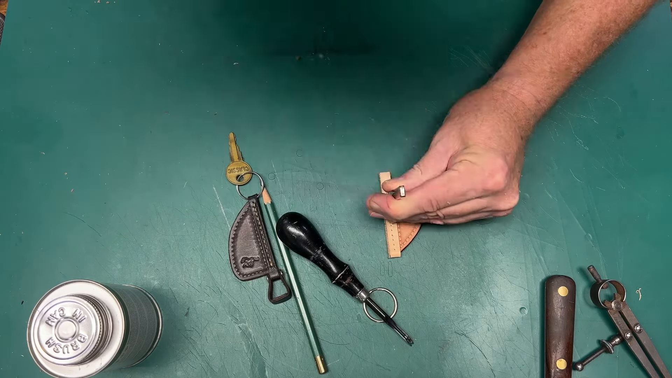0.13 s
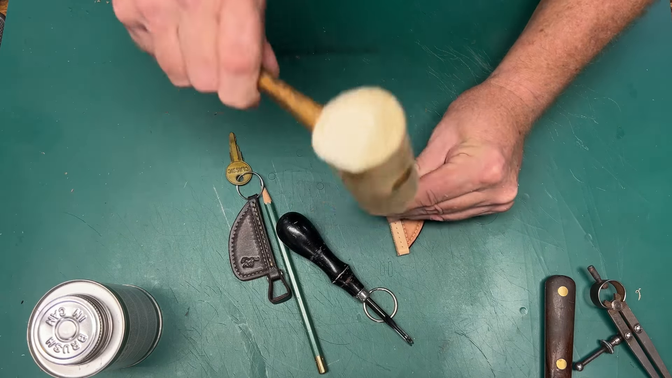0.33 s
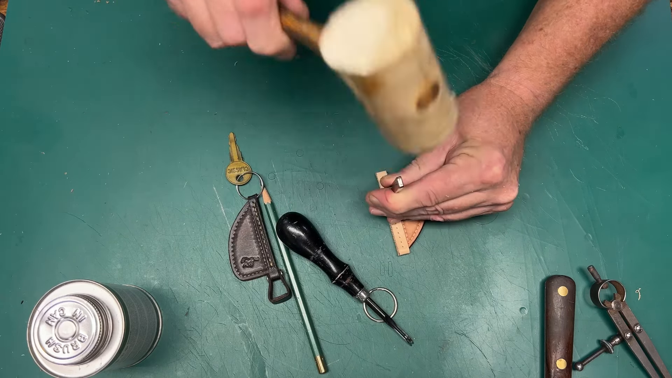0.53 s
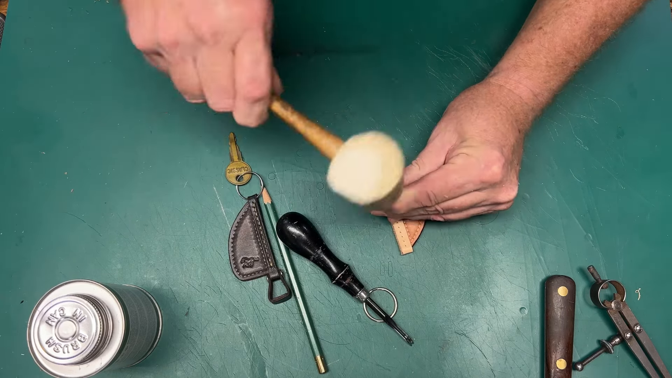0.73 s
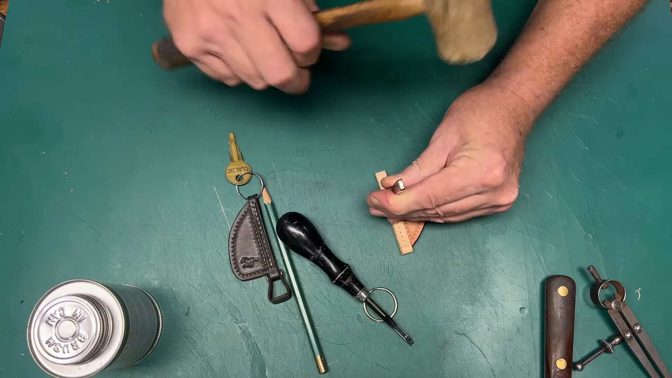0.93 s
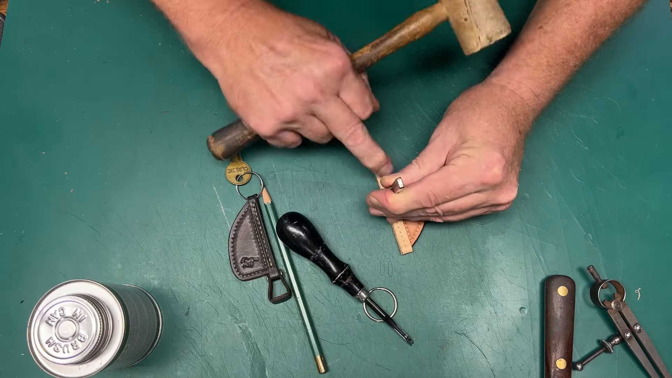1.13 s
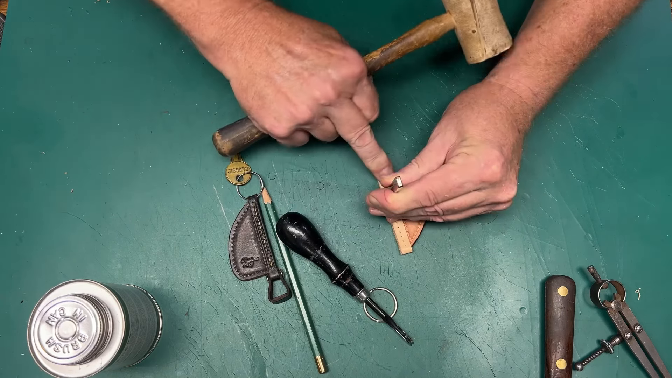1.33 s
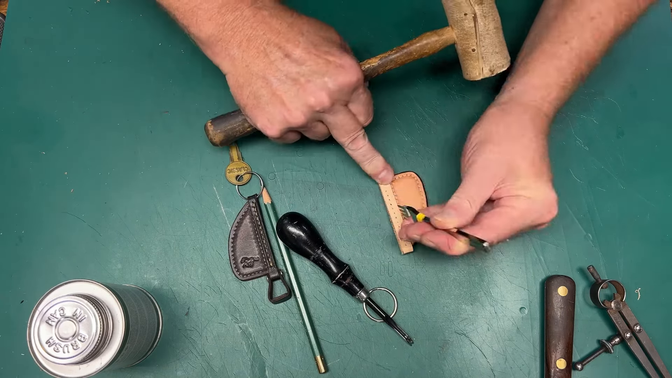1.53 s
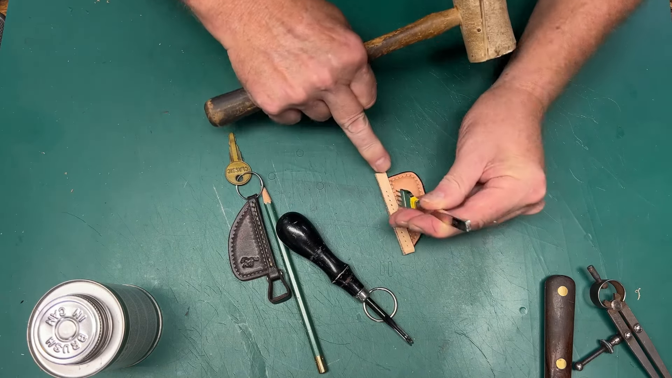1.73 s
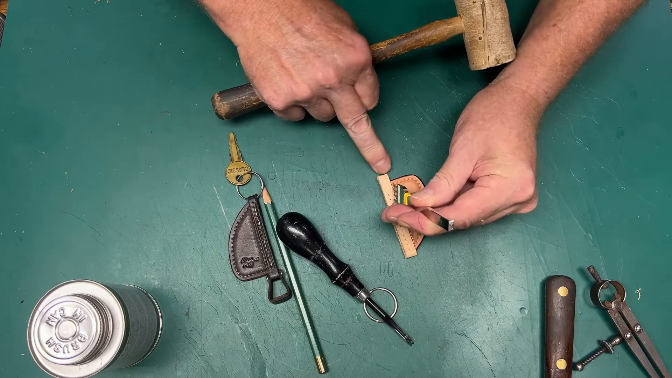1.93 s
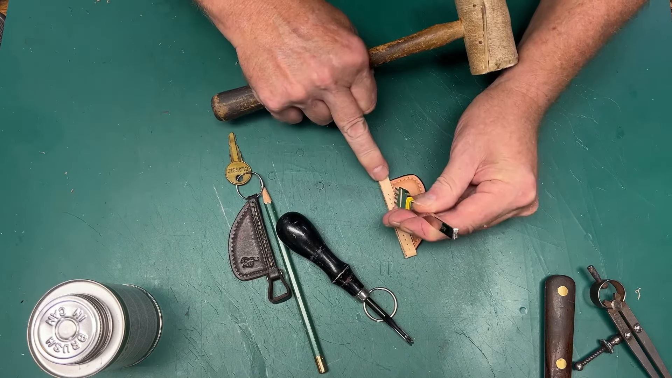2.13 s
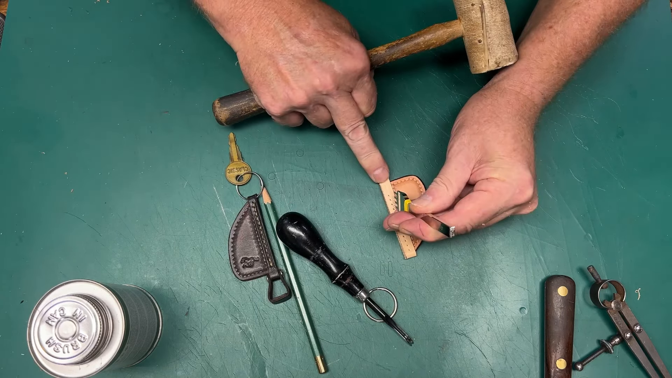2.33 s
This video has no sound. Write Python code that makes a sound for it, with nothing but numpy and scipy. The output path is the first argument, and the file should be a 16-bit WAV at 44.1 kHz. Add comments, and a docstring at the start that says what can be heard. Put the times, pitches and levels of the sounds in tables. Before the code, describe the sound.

Two hard mallet cracks on a stitching iron over a wooden bench, then faint handling taps.

```python
"""A mallet drives a stitching iron into leather on a wooden bench, twice; two light taps of the iron follow.
Each blow is a crack that the bench top spreads into a falling chirp, with echoes, decaying sine modes
and a dying noise tail for the room. Filtered grains make the scuffs of fingers and iron, and a rustling
treble wash after the second blow; a decaying low sine is the leather dropping back. At the start an
earlier knock dies away as noise, and room noise with a faint wavering mains hum lies under it all."""
import sys
import numpy as np
from scipy import signal
from scipy.fft import rfft, irfft
from scipy.io import wavfile
from scipy.ndimage import uniform_filter1d

SR = 44100
rng = np.random.default_rng(int(sys.argv[2]) if len(sys.argv) > 2 else 0)


def natural_amplitude(level_db):
    """Convert a level in decibels to a linear amplitude factor, elementwise."""
    exponent = np.asarray(level_db, float) / 20
    return 10 ** exponent


def pcm_store(signal):
    """Save signal as 16-bit PCM."""
    levels = np.round(np.clip(np.atleast_2d(signal), -1, 1) * 32767)
    wavfile.write(sys.argv[1], SR, levels.astype(np.int16).T)


N = 105840
LEAD = 1024  # samples of room before a blow for the filters to settle


def read(points, hz):
    """Interpolates a table of (Hz, value) along log frequency."""
    f, value = np.transpose(points)
    return np.interp(np.log(hz + 1), np.log(f + 1), value)


def evened(x):
    """Scales to an rms of 1."""
    return x / np.sqrt(np.mean(x ** 2) + 1e-20)


def add(mix, start_s, sound):
    """Adds a sound to the mix in place, cut at the end."""
    part = mix[:, round(start_s * SR):][:, :sound.shape[1]]
    part += sound[:, :part.shape[1]]


def diffuse(colour, size):
    """Spectra of a coloured noise pair of rms 1, its left-right likeness set by frequency."""
    # Each row: frequency in Hz, left-right likeness from 0 to 1.
    likeness = [(60, 1), (150, 0.066), (380, 0.95), (950, 0.56), (2380, 0.011), (5980, 0.13),
                (15000, 0.026)]
    hz = np.fft.rfftfreq(size, 1 / SR)
    a, b = rfft(rng.standard_normal((2, size)))
    same = np.clip(read(likeness, hz), 0, 1)
    pair = np.array([a, same * a + np.sqrt(1 - same ** 2) * b])
    z = pair * natural_amplitude(read(colour, hz))
    return hz, z / np.sqrt(np.mean(irfft(z, size) ** 2))


def dying(colour, t60s, size):
    """Diffuse noise whose bands die each at its own speed."""
    hz, z = diffuse(colour, size)
    t = np.arange(size) / SR
    one = np.eye(len(t60s))
    total = 0
    for k, (_, t60_s) in enumerate(t60s):
        band = read([(f, w) for (f, _), w in zip(t60s, one[k])], hz)
        total = total + irfft(z * band, size) * natural_amplitude(-60 * t / t60_s)
    return total


def rings(modes, t):
    """Struck modes: one exponentially decaying sine each."""
    return [natural_amplitude(db - 60 * t / t60_s) * np.sin(2 * np.pi * hz * t) for hz, db, t60_s in modes]


def air():
    """Coloured room noise plus hum partials whose amplitudes waver with smoothed noise."""
    # Room noise colour. Each row: frequency in Hz, relative density in dB per Hz.
    air_colour = [(15, -70), (25, -38), (43, -14.5), (68, -5), (87, -19.5), (105, -7), (123, -4.5),
                  (150, -18), (242, -20.5), (354, -23), (600, -30.5), (1300, -37.5), (2500, -45.5),
                  (4370, -58), (8500, -57.5), (10200, -72), (12000, -65.5), (16000, -74.5)]
    # Hum partials. Each row: frequency in Hz, rms level before waver in dB.
    hum_partials = [(59.2, -67.5), (118.4, -64)]
    air_db, hum_width_hz, hum_waver = -59, 6, 0.6
    t = np.arange(N) / SR
    hum = 0
    for hz, db in hum_partials:
        slow = uniform_filter1d(rng.standard_normal(N), int(SR / hum_width_hz))
        waver = 1 + evened(slow) * hum_waver
        hum = hum + np.sqrt(2) * natural_amplitude(db) * waver * np.sin(2 * np.pi * (hz * t + rng.random()))
    return natural_amplitude(air_db) * irfft(diffuse(air_colour, N)[1], N) + hum


def earlier_knock():
    """Tail of an earlier knock: diffuse noise with a decay time per band."""
    # Tail colour. Each row: frequency in Hz, relative density in dB per Hz.
    tail_colour = [(24, -37.5), (40, -17.5), (60, 2.5), (97, -16), (132, 2), (167, -21), (218, 12),
                   (264, -25), (335, -9), (386, -14.5), (415, -3.5), (446, -27), (718, -22), (1080, -28),
                   (1700, -28.5), (1960, -23.5), (3080, -41.5), (3470, -24), (4000, -39.5), (5730, -39.5),
                   (8190, -60.5), (9910, -70.5), (12000, -58), (15600, -105), (22000, -120)]
    # Tail decay. Each row: frequency in Hz, t60 in seconds.
    tail_t60s = [(60, .45), (130, .3), (230, .24), (400, .4), (800, .45), (1500, .45), (3500, .36),
                 (8000, .33)]
    earlier_db = -30
    return natural_amplitude(earlier_db) * dying(tail_colour, tail_t60s, size=32768)


def scuff(length_s, db, hz, width_hz):
    """A swelling cluster of tiny grains through one broad resonance, with a short diffuse tail."""
    grains_per_s, grain_spread_db, wet_db, tail_t60_s = 5700, 1, -5.5, 0.24
    t = np.arange(0, length_s + 0.17, 1 / SR)
    grains = rng.standard_normal(len(t)) * (rng.random(len(t)) < grains_per_s / SR)
    grains *= natural_amplitude(grain_spread_db * rng.exponential(1, len(t)))
    b, a = signal.iirpeak(hz, hz / width_hz, SR)

    def band(v):
        return evened(signal.lfilter(b, a, signal.lfilter(b, a, v)))

    ramp = np.minimum(t / length_s, 1)
    shape = np.sin(np.pi * ramp ** 1.2) ** 0.84
    tail = natural_amplitude(wet_db - 60 * abs(t - 0.44 * length_s) / tail_t60_s) * ramp
    return natural_amplitude(db) * (band(grains) * shape + tail * band(rng.standard_normal((2, len(t)))))


def thump():
    """The leather drops back: one soft low swing of the bench, a decaying sine."""
    level_db, hz, t60_s, rise_s = -36, 70, 0.214, 0.035
    t = np.arange(0, 0.4, 1 / SR)
    envelope = natural_amplitude(level_db - 60 * t / t60_s) * (1 - np.exp(-t / rise_s))
    return envelope * np.sin(2 * np.pi * hz * t) * np.ones((2, 1))


def ringing(size):
    """Bench modes as decaying sines and the room tail as dying noise, the same for every blow."""
    # Bench modes. Each row: frequency in Hz, relative level in dB, t60 in seconds.
    bench_modes = [(58.7, -11.5, 0.29), (84.16, -7, 0.4), (109.26, -6.5, 0.41), (137.45, 2.5, 0.2),
                   (240, -7.5, .4), (334, -2.5, .3), (415, -19, .3), (496, -12.5, 0.23), (619, -23.5, 0.49),
                   (763, -18.5, 0.19)]
    # Room tail colour. Each row: frequency in Hz, relative density in dB per Hz.
    room_colour = [(24, -46), (40, -19.5), (124, -8.5), (163, -10), (231, -4), (269, -11), (337, -3),
                   (444, -12), (615, -9), (2320, -21.5), (8990, -45), (10200, -71), (16000, -92)]
    # Room tail decay. Each row: frequency in Hz, t60 in seconds.
    room_t60s = [(60, .55), (160, 0.65), (420, 0.51), (1100, 0.48), (2900, .45), (7700, .42), (14000, .3)]
    bench_db, bench_wide, bench_rise_s = -12.5, 0.083, 0.005
    room_db, early_db, early_t60_s, room_rise_s = -20, 2, 0.19, 0.0041
    t = np.arange(size) / SR
    # random left and right gains per mode
    bench = sum(ring * (1 + bench_wide * rng.standard_normal((2, 1))) for ring in rings(bench_modes, t))
    bench = bench * (1 - np.exp(-t / bench_rise_s))
    early_boost = 1 + natural_amplitude(early_db - 60 * t / early_t60_s)
    room = dying(room_colour, room_t60s, size) * early_boost * (1 - np.exp(-t / room_rise_s))
    return natural_amplitude(bench_db) * bench + natural_amplitude(room_db) * room


def blow(db, tilt_db, path_m, after):
    """Crack, snap and modes spread by bending waves so that treble comes first, plus unspread echoes."""
    # Crack colour. Each row: frequency in Hz, relative density in dB.
    crack_colour = [(30, -33), (60, -12.5), (150, -6), (300, -0.5), (450, 1), (600, -1), (800, -10.5),
                    (1100, -18), (1500, -7), (2000, -13), (2800, -22.5), (5000, -26), (16000, -62),
                    (18000, -88.5)]
    # Noise snap colour. Each row: frequency in Hz, relative density in dB per Hz.
    snap_colour = [(500, -31.5), (1200, -8), (2000, 2), (3500, -6.5), (5700, -12), (7700, -15), (9000, -11),
                   (10500, -20), (16000, -31.5), (18000, -67.5)]
    # Mallet head and iron modes. Each row: frequency in Hz, relative level in dB, t60 in seconds.
    mallet_modes = [(325.5, -13.5, 0.01), (518, -8.5, .025), (588, -8, 0.033), (1557, -11.5, 0.006),
                    (1960, -11, 0.018), (2400, -19, 0.041), (3276, -20.5, .02), (4600, -24.5, 0.0071),
                    (6020, -26.5, 0.0083), (9280, -27.5, .01)]
    # First strong reflections. Each row: delay in seconds, relative level in dB, signed factor.
    reflections = [(0.018, -9.5, 1), (.0213, -10.5, -1), (0.027, -10.5, 1), (.0368, -14, -0.52)]
    snap_db, snap_t60_s, snap_rise_s, snap_wide = -9.5, 0.014, 0.001, 0.46
    # group speed at 1 kHz, growing with the root of frequency up to thick_hz, then constant
    bend_m_per_s, thick_hz = 190, 2000
    echo_top_hz, lag_s = 180, -0.00004  # left leads
    size = after.shape[1]
    hz, t = np.fft.rfftfreq(size, 1 / SR), np.arange(size) / SR

    def late(s):
        return np.exp(-2j * np.pi * hz * s)

    def peak1(z):
        return z / abs(irfft(z, size)).max()

    root = 2 * np.sqrt(np.minimum(hz, thick_hz)) + np.maximum(hz - thick_hz, 0) / np.sqrt(thick_hz)
    bend = np.exp(-2j * np.pi * path_m / bend_m_per_s * np.sqrt(1000) * root)
    crack = peak1(natural_amplitude(read(crack_colour, hz)) * bend)

    echo_pulse = peak1(hz / (hz + 80) / (1 + (hz / echo_top_hz) ** 3))
    echoes = echo_pulse * sum(sign * natural_amplitude(e_db) * late(s) for s, e_db, sign in reflections)

    snap_envelope = natural_amplitude(snap_db - 60 * t / snap_t60_s) * (1 - np.exp(-t / snap_rise_s))
    mid, side = irfft(diffuse(snap_colour, size)[1], size) * snap_envelope
    snap = np.array([mid + snap_wide * side, mid - snap_wide * side])
    struck = bend * rfft(sum(rings(mallet_modes, t)) + snap)

    near = (crack + echoes + struck) * np.array([late(lag_s), 1 + 0 * hz])
    z = near + bend * rfft(after)
    tilt = natural_amplitude(tilt_db * np.log2(1 + hz / 500))
    return natural_amplitude(db) * irfft(z * late(LEAD / SR) * tilt, size)[:, :-LEAD]


def scene():
    """Lays all sources over the air, then sets the left-right balance."""
    # Fingers and iron, and a rustling treble wash after the second blow. Each row: start in seconds,
    # swell length in seconds, level in dB, centre in Hz, width in Hz.
    scuff_rows = [(0.704, .12, -45.5, 2850, 1500), (0.806, 0.15, -58.5, 2500, 3000),
                  (0.869, 0.17, -82, 7000, 5000), (0.871, .06, -78, 14000, 4000),
                  (0.952, .07, -77.5, 14600, 4000), (1.192, 0.046, -79.5, 4990, 3040),
                  (1.293, .055, -76, 6250, 5000), (1.40, .03, -60, 3510, 1200),
                  (1.388, 0.046, -66, 6600, 3060), (1.398, 0.027, -68.5, 11600, 2000),
                  (1.403, 0.026, -63, 650, 684), (1.436, .01, -70, 6000, 6000),
                  (1.508, .005, -77, 10000, 6000), (1.613, 0.033, -81, 5900, 5000),
                  (1.652, .012, -78.5, 2400, 1205), (1.652, .03, -82.5, 5900, 3000),
                  (1.815, 0.028, -85, 4300, 796), (2.152, 0.011, -78, 4315, 2472)]
    # Two blows, then two light taps of the iron. Each row: start in seconds, relative level in dB,
    # treble tilt in dB per octave (well above 500 Hz), path through the bench in m.
    blow_rows = [(0.2257, 1, 1.5, 0.65), (0.6929, 0, 2, 0.62), (1.418, -53.5, 1.5, .5),
                 (1.6491, -55, 2, .5)]
    thump_s, left_over_right_db = 1.419, 1.5
    mix = air()
    after = ringing(size=32768)
    add(mix, 0, earlier_knock())
    for start_s, *row in scuff_rows:
        add(mix, start_s, scuff(*row))
    add(mix, thump_s, thump())
    for start_s, *row in blow_rows:
        add(mix, start_s - LEAD / SR, blow(*row, after))
    return mix * natural_amplitude(np.array([[left_over_right_db / 2], [-left_over_right_db / 2]]))


def low_pass(x):
    """Removes everything above the highest recorded frequency."""
    return signal.sosfilt(signal.butter(12, 17350, fs=SR, output="sos"), x)


def record(dry):
    """Gain control: a held level falling steadily in dB sets the cut, a share of its excess over a limit."""
    limit_db, squeeze, hold_fall_db_per_s, grab_s = -28, 0.22, 103.5, 0.002
    power = uniform_filter1d((dry ** 2).mean(0), int(grab_s * SR))
    power_db = 10 * np.log10(abs(power) + 1e-12)
    fall_db = np.arange(N) * hold_fall_db_per_s / SR
    held_db = np.maximum.accumulate(power_db + fall_db) - fall_db
    over_db = np.maximum(held_db - limit_db, 0)
    mix = dry / natural_amplitude(squeeze * uniform_filter1d(over_db, size=60))
    return low_pass(mix)


dry = scene()
out = record(dry)
pcm_store(out)
```